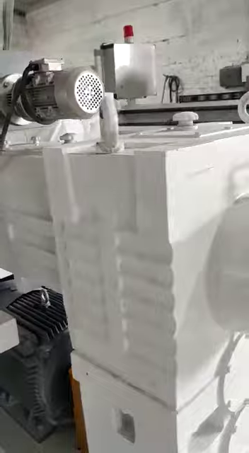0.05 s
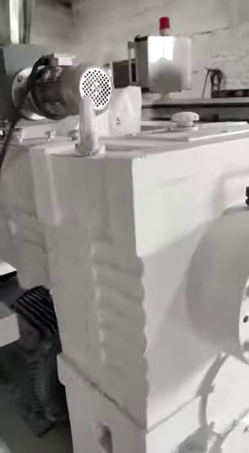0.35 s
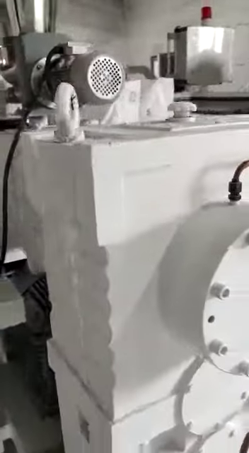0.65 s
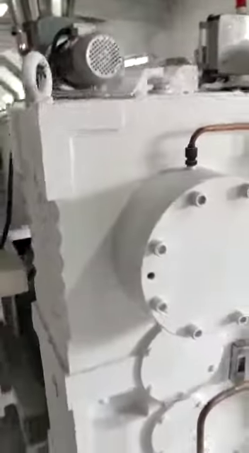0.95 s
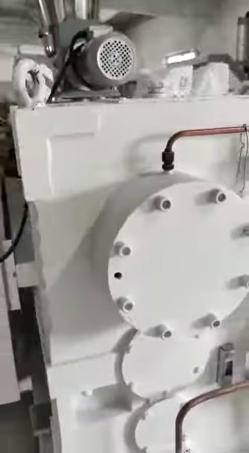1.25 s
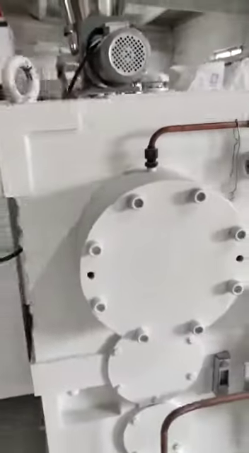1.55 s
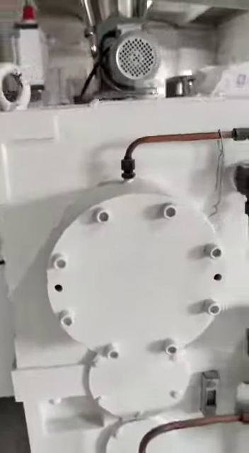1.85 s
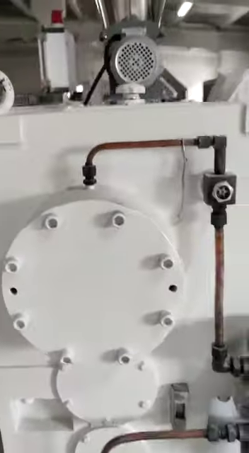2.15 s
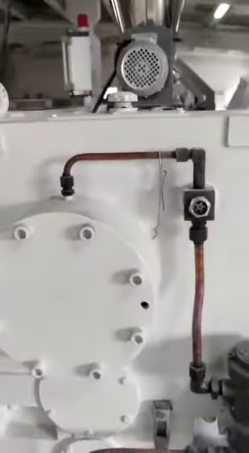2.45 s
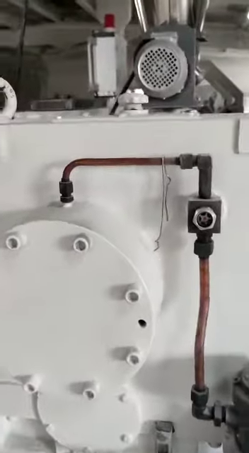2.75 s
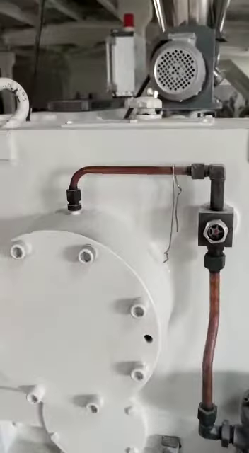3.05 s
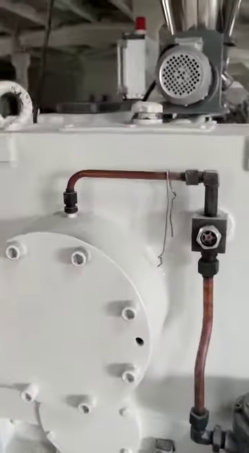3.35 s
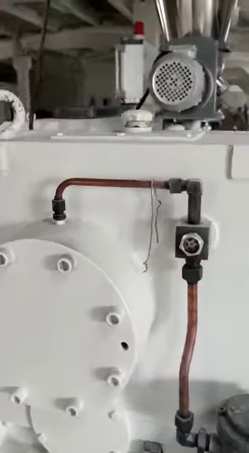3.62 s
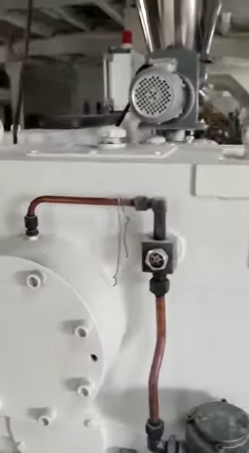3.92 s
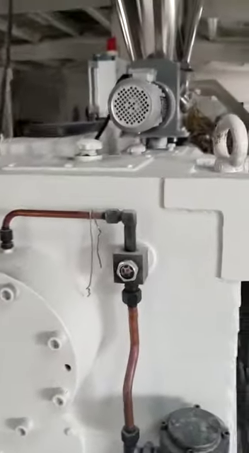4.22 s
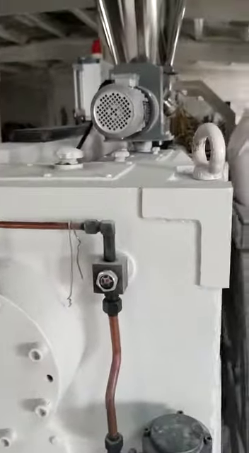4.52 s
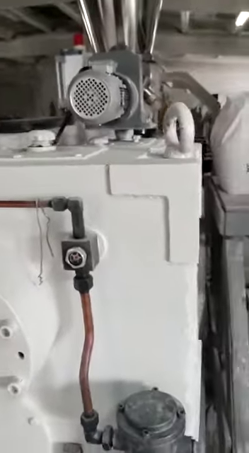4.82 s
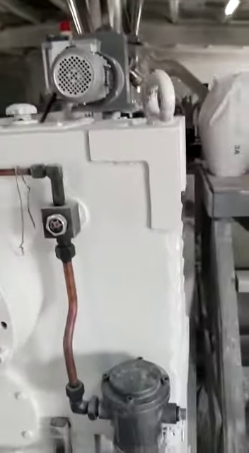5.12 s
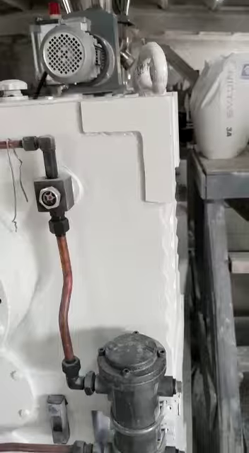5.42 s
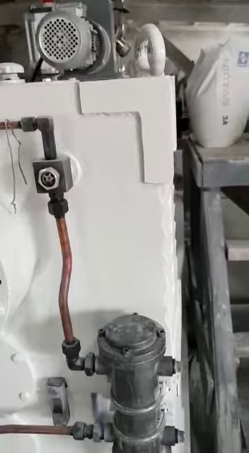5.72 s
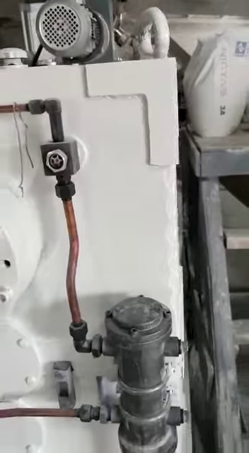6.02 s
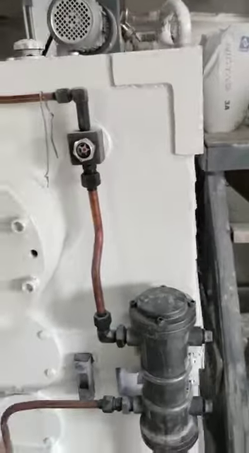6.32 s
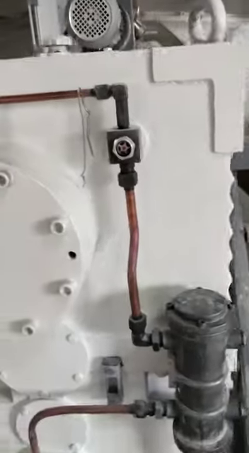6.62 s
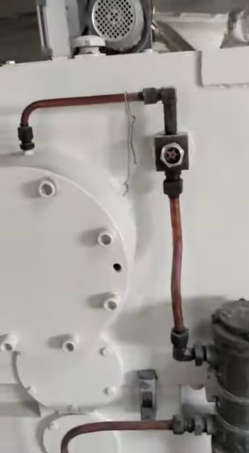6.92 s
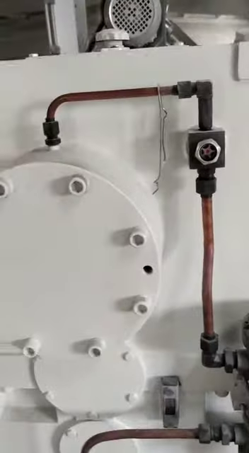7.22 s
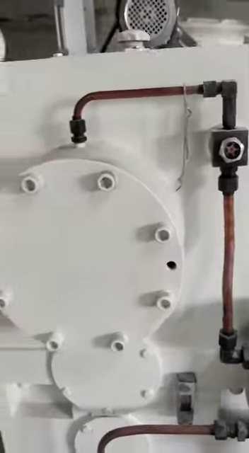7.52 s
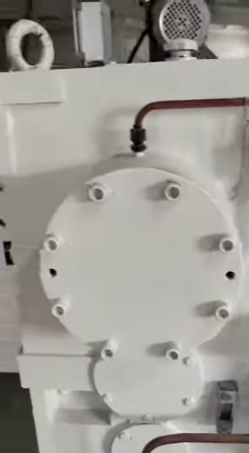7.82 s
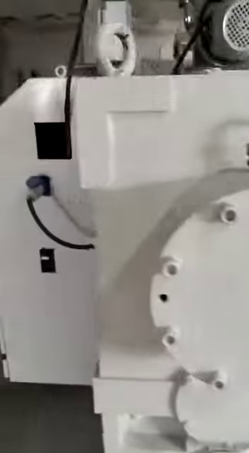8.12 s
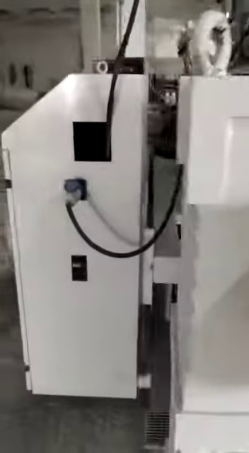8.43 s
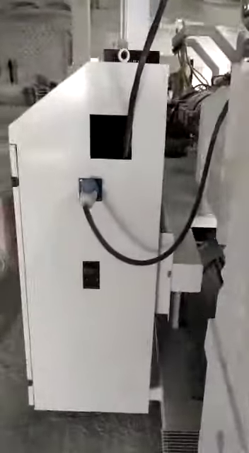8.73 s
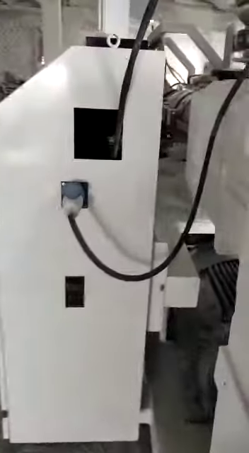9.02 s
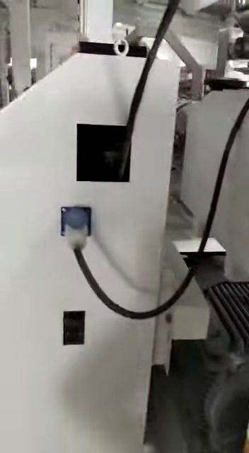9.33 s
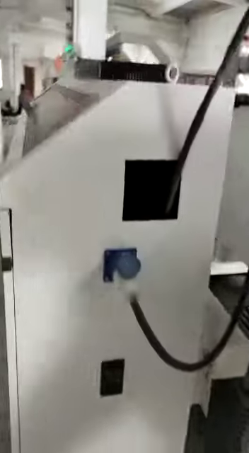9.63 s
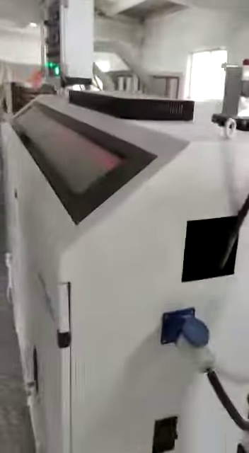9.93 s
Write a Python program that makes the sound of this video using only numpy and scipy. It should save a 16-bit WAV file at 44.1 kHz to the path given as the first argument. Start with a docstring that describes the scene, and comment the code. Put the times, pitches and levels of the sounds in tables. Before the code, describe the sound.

Steady factory machinery hums with a pulsing gear drone and thin electric whine, then a valve releases a short, whistling blast of air.

```python
"""The gearbox of a running plastic extruder, close up in a factory hall, on a handheld stereo microphone.
We walk along it and back to the control cabinet. The gear mesh drones and throbs with each shaft turn,
the inverter makes the motor whine, fans hum and rush; the tones swell and fade along the walk.
Near the end a valve blows off air, and the recorder's gain control ducks the drone under the hiss."""
import sys
import numpy as np
from scipy import signal
from scipy.fft import rfft, irfft, next_fast_len
from scipy.io import wavfile

SR = 44100
rng = np.random.default_rng(int(sys.argv[2]) if len(sys.argv) > 2 else 0)


def pcm_store(signal):
    """Save signal as 16-bit PCM."""
    levels = np.round(np.clip(np.atleast_2d(signal), -1, 1) * 32767)
    wavfile.write(sys.argv[1], SR, levels.astype(np.int16).T)


N = 439236
TIME = np.arange(N) / SR
STEP = 6   # samples per point of the coarse grid, which carries low sounds and slow changes
COARSE = TIME[::STEP]

SHAFT_HZ, TEETH = 11.515, 19
SWITCH_HZ, SUPPLY_HZ = 3999.7, 23.35
VALVE_OPENS_S, PRESSURE_FALLS_S = 8.208, 8.837


# Gear tones, close to the gearbox: tooth_rate_multiple, level_db, sidebands_against_tone_db
MESH_HARMONICS = [(1, -43, -4.5), (2, -23.5, -11.5), (3, -45.3, -4), (4, -36.5, -8.5), (5, -33.2, -7),
                  (6, -43.5, -13.5), (7, -47, -5), (8, -53, -3), (9, -48.5, -10), (10, -48.5, -6),
                  (11, -43.5, -9.5), (12, -51, -4.5)]
# The main drone (2nd harmonic) as the microphone passes: time_s, relative_db, left_minus_right_db
DRONE_ON_WALK = [(0.0, -29.5, -13), (0.35, -34, -19), (0.85, -22, -1), (1.55, -24, 0.5), (2.05, -24.5, -4),
                 (2.35, -31.5, -6), (3.2, -25.5, -3), (3.6, -22.5, -3), (4.45, -20, -3), (4.7, -22.5, -2),
                 (5.0, -19, -3), (5.45, -21, -4), (5.72, -27, -6), (6.05, -24.5, -2), (6.42, -29.5, -5),
                 (6.7, -23.5, -2), (7.6, -21, 3), (8.0, -29.5, 8), (8.22, -19, 2), (8.45, -18, -1),
                 (8.8, -25, -3), (9.15, -24, 6), (9.55, -34, 9), (9.85, -29.5, 12)]
# The 4th harmonic on the walk, dipping further under the hiss: time_s, relative_db, left_minus_right_db
FOURTH_ON_WALK = [(0, -29.5, 2.0), (0.5, -29, 4), (1.4, -38, -5), (1.9, -26.5, 2.0), (2.5, -36, -4.0),
                  (3.1, -37, 3.5), (4.0, -32, -2.5), (4.9, -33, 1), (5.5, -32.5, -3), (6.4, -35.5, 1),
                  (7.7, -30, 2), (8.05, -35.5, -6), (8.28, -25.5, -4), (8.58, -38, -9), (9.18, -27, -3),
                  (9.5, -32, -2), (9.96, -33, 0.5)]
# The 5th harmonic on the walk: time_s, relative_db, left_minus_right_db
FIFTH_ON_WALK = [(0, -26, 0), (0.6, -33, 2), (1.8, -33, -1), (2.3, -29, 5), (2.9, -26.5, 5), (3.4, -28, 7),
                 (3.75, -32.5, 8), (4.1, -29.5, 2.5), (5.08, -26, -1), (5.8, -27, -3), (6.85, -29, 4),
                 (7.15, -24, 1), (8.2, -33, 5), (8.55, -37, 0), (9.25, -29, 0), (9.96, -35, 4)]

def gear_mesh(wander_rad=0.1, fade_db=3.0, upper_pan_db=11.0):
    """Meshing teeth sound harmonics of the tooth rate, which swell and fade along the walk."""
    on_walk = {2: DRONE_ON_WALK, 4: FOURTH_ON_WALK, 5: FIFTH_ON_WALK}
    lead = wander_rad * drift(0.71)   # the load pulls the shaft slightly ahead and back
    out = 0
    for harmonic, level_db, side_db in MESH_HARMONICS:
        gain = from_db(level_db)
        if harmonic in on_walk:
            walk_db, pan_db = in_time(on_walk[harmonic])
            gain = gain * swell(walk_db) * panned(pan_db)
        elif harmonic > 2:   # short waves reach the two capsules unequally
            gain = gain * fading(fade_db, rate_hz=4.1) * panned(upper_pan_db)[:, None]
        phase = tone_phase(harmonic * TEETH * SHAFT_HZ) + harmonic * lead
        fall_db, level_share = (10.0, .1) if harmonic == 2 else (5.0, .7)
        out = out + gain * throbbing(phase, side_db, fall_db, level_share, lean_db=2.0).real
    return out


def throbbing(phase, side_db, fall_db, level_share, lean_db, count=5, uneven=0.31):
    """An eccentric shaft gives a complex tone sidebands, wobbling it partly in level, partly in pitch."""
    orders = np.r_[-count:0, 1:count + 1]
    wobble = each_turn(orders, side_db - fall_db * np.log2(abs(orders)) - lean_db * np.sign(orders))
    wobble = wobble * rms_one(1 + uneven * drift(6.7))   # no two turns are quite alike
    in_level = np.sqrt(2 * level_share) * wobble.real
    in_pitch = np.sqrt(2 * (1 - level_share)) * wobble.imag
    return np.sqrt(2) * (1 + in_level + 1j * in_pitch) * np.exp(1j * phase)


# Tooth knocks, heard beside the housing: pitch_hz, level_db (per shaft order)
KNOCK_SPECTRUM = [(60, -64), (92, -48), (200, -50), (250, -57.5), (330, -40), (420, -52.5), (510, -48),
                  (580, -52), (700, -47), (1100, -90), (1500, -83), (3000, -76)]

def tooth_knocks(side_db=-5.5, scatter_db=2.5):
    """Uneven teeth knock the housing in the same pattern on every turn."""
    orders = np.arange(5, 260)
    level_db = at_hz(KNOCK_SPECTRUM, orders * SHAFT_HZ) + scatter_db * rng.standard_normal(len(orders))
    mid, side = [each_turn(orders, level_db).real for _ in range(2)]
    return mid + from_db(side_db) * side * [[1], [-1]]


# Bearing rumble, heard beside the housing: pitch_hz, density_db
RUMBLE_SPECTRUM = [(20, -88), (40, -76), (68, -66.5), (92, -53.5), (110, -59), (130, -57.5), (175, -53.5),
                   (250, -60.5), (295, -55.5), (325, -46.5), (380, -54), (430, -47), (520, -57),
                   (720, -64.5), (3000, -120)]

def housing(ring_hz=325, rise_db_per_s=0.07):
    """Knocks and bearing rumble ring the casing and form a shallow standing wave."""
    wave = standing_wave(ring_hz, loudest_m=0.0069, reflection=0.11, time=TIME)
    gain = rms_one(wave * from_db(rise_db_per_s * TIME))
    return gain * (full_rate(tooth_knocks()) + noise(RUMBLE_SPECTRUM))


# Inverter tones from the motor: switch_rate_multiple, offset_in_supply_multiples, level_db
WHINE_LINES = [(1, -15, -43), (1, -9, -39.5), (1, -5, -43), (1, -3, -30), (1, -1, -38.5), (1, 1, -43),
               (1, 3, -36), (1, 9, -45), (1, 11, -54), (1, 20, -53.5), (2, -4, -47.5), (2, 0, -53.5),
               (2, 2, -64), (2, 4, -58), (3, -5, -69), (3, -2, -65), (3, -1, -63), (3, 1, -69), (3, 2, -65),
               (3, 5, -69)]
# The whine at the moving microphone: time_s, relative_db, left_minus_right_db
WHINE_ON_WALK = [(0, -22.5, 4.5), (0.5, -22, 4), (1.15, -22, 2), (1.5, -23.3, 5.5), (1.9, -23, 5.5),
                 (2.38, -25, 6.5), (2.7, -20.5, 9), (2.95, -23, 10), (3.2, -20.5, 10), (3.45, -22.5, 4),
                 (3.75, -20.5, 6), (4.0, -24, 8), (4.2, -22, 4), (4.75, -24.5, 3.5), (5.4, -23, 5),
                 (5.7, -22, 2.5), (6.2, -26.5, 2), (6.5, -21, 4), (6.7, -27, 4), (6.9, -21, 7.5),
                 (7.12, -27, 6), (7.45, -24.3, 6), (8.1, -24, 4.5), (9.35, -22, 2), (9.96, -22, 6)]

def inverter_whine(waver_rad=0.18, fade_db=1.8):
    """Switching ripple makes the motor iron sing in clusters, fluttering as the rotor turns."""
    clusters = {SWITCH_HZ: ripple_skirt()}
    for multiple, offset, line_db in WHINE_LINES:
        carrier_hz = multiple * SWITCH_HZ
        phase = tone_phase(carrier_hz + offset * SUPPLY_HZ, carrier_hz, stray=.35)
        phase = phase + waver_rad * drift(6.5)
        gain = from_db(line_db) * fading(fade_db, rate_hz=5.2)
        line = throbbing(phase, side_db=-12.5, fall_db=4.5, level_share=.3, lean_db=-4.5, count=3)
        clusters[carrier_hz] = clusters.get(carrier_hz, 0) + gain * line
    walk_db, pan_db = in_time(WHINE_ON_WALK)
    out = 0
    for carrier_hz, cluster in clusters.items():   # shift each cluster up to its carrier
        cluster = cluster * swell(walk_db) * panned(pan_db)
        angle = 2 * np.pi * carrier_hz * TIME
        out = out + full_rate(cluster.real) * np.cos(angle) - full_rate(cluster.imag) * np.sin(angle)
    return out


def ripple_skirt(level_db=-48.5, fall_db=1.2):
    """Faint lines around the switching rate, a step either side of every sixth supply multiple."""
    offsets = np.r_[-43:20:6, -41:20:6]
    line_db = level_db - fall_db * np.log2(abs(offsets))
    return np.sqrt(2) * np.array([each_turn(offsets, line_db, SUPPLY_HZ) for _ in range(2)])


# The bare air jet, before port and steel colour it: pitch_hz, relative_db
JET_SPECTRUM = [(700, -70), (1500, -18), (2000, -16.5), (2200, -13.5), (2450, -5), (2700, -3), (3300, -3.5),
                (4200, -5), (5100, -11), (6500, -11.5), (8000, -13.5), (8800, -26.5), (10000, -26.5),
                (13000, -33.5), (15500, -37)]

def blow_off(flutter_db=0.97, treble_hz=4500):
    """A jet of air sputters, rings its exhaust port and bounces off steel; a faint puff follows."""
    jet = noise(JET_SPECTRUM)
    puff = late_puff(jet)
    flow, treble_gain = valve()
    blowing = slice(int(VALVE_OPENS_S * SR), N)
    jet[:, blowing] = exhaust_port(jet[:, blowing], flow[blowing] / flow.max())
    jet[:, blowing] += steel_echoes(jet, TIME[blowing])
    jet = jet / np.std(jet[:, blowing])
    body = filtered(jet, 1, treble_hz, "low")
    blast = flow * (body + treble_gain * (jet - body))
    return (blast + puff) * from_db(flutter_db * drift(30, TIME)) + whistles(flow)


def valve(level_db=-11, crack_share=0.17, crack_s=0.02, widen_s=0.25, sag_db_per_s=1.5, empty_s=0.36):
    """Gains of the jet and its treble: the seal cracks, the gap widens, the flow sags, the line empties."""
    opened, emptying = since(VALVE_OPENS_S), since(PRESSURE_FALLS_S)
    gap = crack_share * np.minimum(opened / crack_s, 1)
    gap += (1 - crack_share) * np.minimum(opened / widen_s, 1)
    flow = gap * from_db(level_db - sag_db_per_s * opened) * np.exp(-(emptying / empty_s) ** 2)
    shrill_db = 7.5 * np.exp(-opened / 0.2)   # shrill while the gap is narrow
    dull_db = np.maximum(-58 * emptying, -30)   # duller as the pressure falls
    return flow, from_db(shrill_db + dull_db)


# Peaks and hollows of the exhaust port at full flow: pitch_hz, width_hz, gain_db
PORT_RESONANCES = [(2090, 40, 6), (2260, 50, 10), (2165, 40, -7), (2350, 70, -16), (2625, 40, -7),
                   (2713, 16, 6), (2760, 18, 7), (2812, 30, -7), (2859, 12, 7), (2955, 16, 7),
                   (3030, 50, -6), (3115, 35, 6), (3255, 22, 5), (3330, 30, -6), (3605, 35, 7),
                   (4150, 80, 3), (4290, 50, -8), (4590, 80, -12), (4800, 100, 4), (4910, 60, -9),
                   (6700, 140, 3), (7350, 350, -5)]

def exhaust_port(jet, strength):
    """The port colours the jet, ringing hardest at full flow."""
    drive = (strength + 1e-3) ** 0.24
    for hz, width_hz, gain_db in PORT_RESONANCES:
        ring = signal.lfilter(*signal.iirpeak(hz, hz / width_hz, fs=SR), jet)
        jet = jet + drive * (from_db(gain_db) - 1) * ring
    return jet


# Steel faces near the microphone: delay_s, delay_change_s_per_m (along the walk), gain
STEEL_FACES = [(.0060, .0007, .36), (.0084, .0005, .28)]

def steel_echoes(jet, time, above_hz=4000):
    """Small steel faces return only the short waves; the delays slide as the microphone moves."""
    treble = filtered(jet, 2, above_hz, "high")
    place_m = position(time)
    return sum(gain * delayed(treble, delay_s + s_per_m * place_m, time)
               for delay_s, s_per_m, gain in STEEL_FACES)


# Whistles at the port: pitch_hz, full_flow_level_db, strongest_s, fade_db_per_s (either side)
PORT_WHISTLES = [(2268, -29.5, 8.6, 16), (2713, -21.5, 8.55, 22), (2748, -29, 8.38, 35),
                 (2859, -30, 8.78, 35), (3100, -32, 8.6, 25), (3595, -28, 8.78, 6)]

def whistles(flow, waver_rad=0.43, flicker_db=1.6, pitch_sag=0.0125):
    """Air whistles over the port's edges; each tone takes its turn, wavers and sinks with the pressure."""
    blowing = TIME > VALVE_OPENS_S
    time, strength = TIME[blowing], flow[blowing] / flow.max()
    pressure_lost = (1 - strength) * (time > PRESSURE_FALLS_S)
    turns_per_hz = time - pitch_sag * np.cumsum(pressure_lost) / SR
    out = np.zeros((2, N))
    for hz, level_db, strongest_s, fade_db_per_s in PORT_WHISTLES:
        waver = waver_rad * np.array([drift(14, time), drift(13, time)])
        db = level_db - fade_db_per_s * abs(time - strongest_s) + flicker_db * drift(4.5, time)
        out[:, blowing] += strength ** 2 * from_db(db) * np.cos(2 * np.pi * hz * turns_per_hz + waver)
    return np.sqrt(2) * out


def late_puff(jet, start_s=9.55, attack_s=0.11, level_db=-30, fall_db_per_s=54, echo_s=.00152):
    """A faint puff of air, made hollow by a short echo, rises quickly and dies away."""
    hiss = filtered(jet, 2, 6500, "high")
    hollow = rms_one(hiss + 0.7 * delayed(hiss, echo_s))
    rise = np.minimum(since(start_s) / attack_s, 1)
    return rise * from_db(level_db - fall_db_per_s * since(start_s + attack_s)) * hollow


def cabinet_fan(blade_hz=366.4, level_db=-31.5, cabinet_db=8.5):
    """The fan's blade tone forms a standing wave and grows as the microphone passes the cabinet."""
    wave = standing_wave(blade_hz, loudest_m=-0.009, reflection=0.66)
    return from_db(level_db + cabinet_db * near_cabinet()) * wave * hum(blade_hz)


# The strongest motor hum at the moving microphone: time_s, relative_db
MOTOR_ON_WALK = [(0, -50), (1.7, -42), (1.95, -28.5), (2.55, -40), (2.85, -55), (3.1, -26), (3.4, -35.5),
                 (3.7, -30.5), (4.4, -30), (5.5, -40), (5.8, -33), (6.1, -38), (6.5, -33), (7.15, -27.5),
                 (7.55, -40), (7.8, -30), (8.15, -40), (9.25, -33.5), (9.96, -44)]
# Steady hums of motors and mains, plus a faint overtone of the cabinet fan: pitch_hz, level_db
STEADY_HUMS = [(50, -54), (80.6, -46.5), (92, -48), (99.9, -47), (122.1, -43), (184.2, -47.5), (207.3, -48),
               (264.8, -42), (276.4, -43.5), (391.5, -40), (518, -40.5), (667.5, -44.5), (1465.6, -49)]

def hums(strongest_hz=171.1, strongest_db=-38.0, waver_db=2.0):
    """One motor's hum swells and fades along the walk; other motors, mains and a fan overtone waver."""
    walk_db, = in_time(MOTOR_ON_WALK)
    strongest = from_db(strongest_db) * swell(walk_db) * hum(strongest_hz)
    return strongest + sum(from_db(db + waver_db * drift(2.1)) * hum(hz) for hz, db in STEADY_HUMS)


# Fan air, all along the machine: pitch_hz, density_db
RUSH_SPECTRUM = [(100, -100), (800, -62.5), (1080, -58), (1250, -64.5), (1650, -65.5), (2130, -63.5),
                 (2330, -67.5), (2750, -66), (3400, -66), (3950, -61.5), (4400, -69.5), (4800, -74),
                 (5130, -72), (5350, -74), (7200, -73), (8000, -68.5), (8250, -81.5), (8900, -96),
                 (9800, -85), (12000, -86), (15800, -96)]

def cooling_air(trim_db=-0.39, rise_db_per_s=0.0644, cabinet_db=2.0, waver_db=0.82):
    """The steady rush of the fans, louder beside the cabinet."""
    db = trim_db + rise_db_per_s * TIME + cabinet_db * near_cabinet(TIME)
    return from_db(db + waver_db * drift(6, TIME)) * noise(RUSH_SPECTRUM)


def buffeting(band_hz=(32, 70), level_db=-48.0, calming_db_per_s=1.5, uneven_db=5.0, pan_db=16.0):
    """Hand and moving air rumble the microphone, mostly on the left; the late puff brings one gust."""
    lumps = rms_one(filtered(rng.standard_normal(len(COARSE)), 2, band_hz, "band", SR / STEP))
    gust_db = 22 * np.exp(-((COARSE - 9.73) / 0.18) ** 2)
    db = level_db - calming_db_per_s * COARSE + uneven_db * drift(1.5) + gust_db
    return from_db(db) * lumps * panned(pan_db)[:, None]


# The microphone's path along the gearbox and back: time_s, place_m (right of the round cover)
MICROPHONE_PATH = [(0, -0.31), (.5, -0.3), (1.15, -0.2), (1.5, -0.11), (2.0, 0.00098), (2.65, 0.22),
                   (3.6, 0.28), (4.4, 0.35), (5.8, 0.38), (6.5, 0.36), (7.15, 0.24), (7.7, 0.12),
                   (8.2, 0.077), (8.65, -0.12), (9.05, -0.35), (9.5, -0.46), (9.96, -0.58)]

def position(time):
    """Where the microphone is, in metres."""
    return in_time(MICROPHONE_PATH, time)[0]


def near_cabinet(time=COARSE, place_m=-0.502, width_m=0.12):
    """1 at the cabinet fan, falling to 0 away from it."""
    return np.exp(-((position(time) - place_m) / width_m) ** 2)


def standing_wave(hz, loudest_m, reflection, time=COARSE, sound_m_per_s=343):
    """Gain of a tone that meets its own reflection: it swells every half wavelength of the walk."""
    lag = 2 * np.pi * hz * 2 * (position(time) - loudest_m) / sound_m_per_s
    return np.sqrt(1 + reflection ** 2 + 2 * reflection * np.cos(lag) + 1e-9)


def fading(depth_db, rate_hz):
    """Random gains of mean power 1: each capsule crosses its own standing waves."""
    return swell(depth_db * np.array([drift(rate_hz), drift(rate_hz)]))


def tone_phase(hz, carrier_hz=0, gap_s=0.00025, stray=0.12):
    """Phase at both capsules, against a carrier; reflections shift short waves more as we move."""
    apart = min(2 * np.pi * hz * gap_s, np.pi / 2) * (1 + stray * drift(0.4))
    turns = (hz - carrier_hz) * COARSE + rng.random()
    return 2 * np.pi * turns + apart * np.array([[.5], [-.5]])


def hum(hz):
    """A sine of unit power that reaches the right capsule first."""
    return np.sqrt(2) * np.cos(tone_phase(hz)[::-1])


# How alike the hall sounds at the two capsules: pitch_hz, correlation
STEREO_LIKENESS = [(30, 0.7), (70, 0.8), (140, 1), (300, 0.95), (550, 0.67), (1000, 0), (4000, 0),
                   (15000, 0)]

def noise(spectrum, left_lead_rad=0.53):
    """Stereo noise of a given density per Hz; only the bass is alike, a little earlier on the left."""
    size = next_fast_len(N)
    hz = np.arange(size // 2 + 1) * SR / size
    alike = np.clip(at_hz(STEREO_LIKENESS, hz), -.99, .99)
    mid, side = rfft(rng.standard_normal((2, size)))
    pair = np.sqrt(1 + alike) * mid + np.sqrt(1 - alike) * side * [[1], [-1]]
    pair = pair * np.exp(.5j * left_lead_rad * np.array([[1], [-1]]))
    return irfft(pair * from_db(at_hz(spectrum, hz)) * np.sqrt(SR) / 2, size)[:, :N]


def each_turn(orders, level_db, turn_hz=SHAFT_HZ, size=16384):
    """A complex pattern that repeats with every turn, made of the given orders."""
    lines = np.zeros(size, complex)
    lines[orders] = from_db(level_db) * np.exp(2j * np.pi * rng.random(len(orders)))
    one_turn = size * np.fft.ifft(lines)
    return one_turn[(COARSE * turn_hz * size).astype(int) % size]


def drift(rate_hz, time=COARSE, size=2000):
    """Smooth random wandering of spread 1."""
    pole = np.exp(-2 * np.pi * rate_hz * TIME[-1] / size)
    slow = signal.lfilter([1], [1, -2 * pole, pole * pole], rng.standard_normal(2 * size))[size:]
    return np.interp(time, np.linspace(0, TIME[-1], size), rms_one(slow))


def from_db(db):
    """Decibels to gain."""
    return 10 ** (np.asarray(db) / 20)


def rms_one(x):
    """Scale to unit power."""
    return x / np.sqrt(np.mean(x ** 2) + 1e-20)


def swell(db):
    """A level curve as a gain of unit mean power."""
    return rms_one(from_db(db))


def panned(db):
    """Left and right gains for a level difference."""
    return swell(np.array([db, -db]) / 2)


def in_time(rows, time=COARSE):
    """The columns of a curve on a time grid."""
    time_s, *columns = np.transpose(rows)
    return [np.interp(time, time_s, column) for column in columns]


def at_hz(points, hz):
    """Read a spectrum on a log-frequency axis."""
    pitch_hz, value = np.transpose(points)
    return np.interp(np.log(np.maximum(hz, 1)), np.log(pitch_hz), value)


def since(start_s):
    """Seconds gone by since a start, 0 before it."""
    return np.maximum(TIME - start_s, 0)


def delayed(x, delay_s, time=TIME):
    """Both channels, later by a steady or moving delay."""
    return np.array([np.interp(time - delay_s, TIME, channel) for channel in x])


def filtered(x, order, hz, kind, sample_rate=SR):
    """A low-, high- or band-pass with a flat passband."""
    return signal.sosfilt(signal.butter(order, hz, kind, fs=sample_rate, output="sos"), x)


def full_rate(x):
    """From the coarse grid to every sample."""
    return signal.resample_poly(x, STEP, 1, axis=-1, window=("kaiser", 9))[..., :N]


def scene():
    """The gearbox and everything around it, as they reach the microphone."""
    low_sounds = full_rate(gear_mesh() + cabinet_fan() + hums() + buffeting())
    return low_sounds + housing() + inverter_whine() + cooling_air() + blow_off()


def record(dry, threshold_db=-14.5, squeeze=0.6, response_s=0.067, cutoff_hz=15600):
    """The recorder's gain control turns loud passages down; peaks clip and the top is cut."""
    pole = np.exp(-1 / (response_s * SR))
    power = signal.lfilter([1 - pole], [1, -pole], np.mean(dry ** 2, axis=0))
    over_db = np.maximum(10 * np.log10(power + 1e-12) - threshold_db, 0)
    held = np.clip(dry * from_db(-squeeze * over_db), -1, 1)
    return signal.sosfilt(signal.ellip(12, .1, 90, cutoff_hz, fs=SR, output="sos"), held)


dry = scene()
out = record(dry)
pcm_store(out)
```